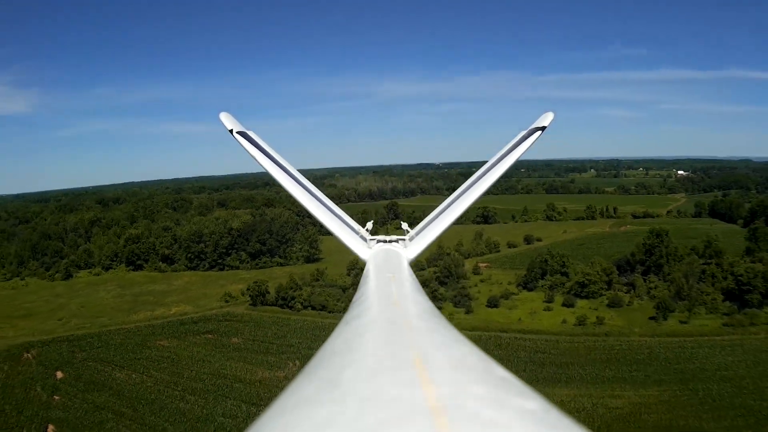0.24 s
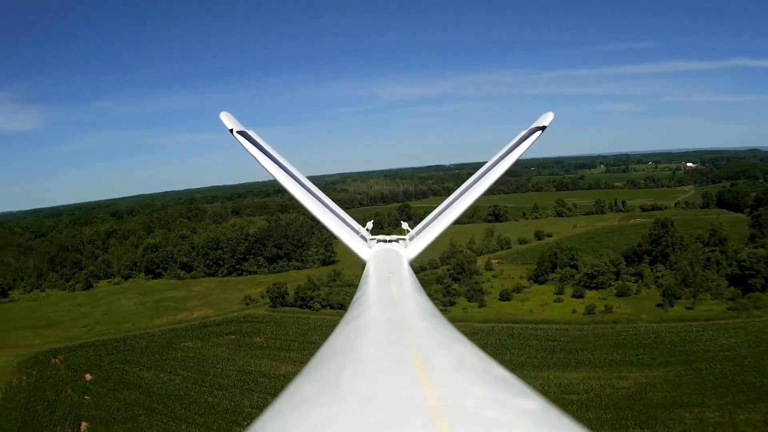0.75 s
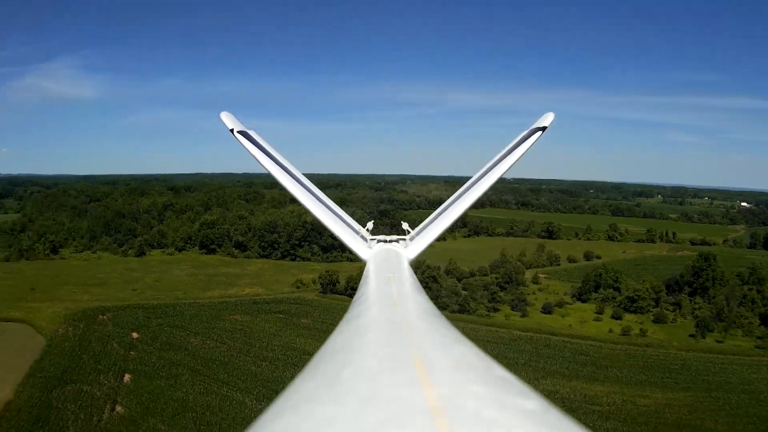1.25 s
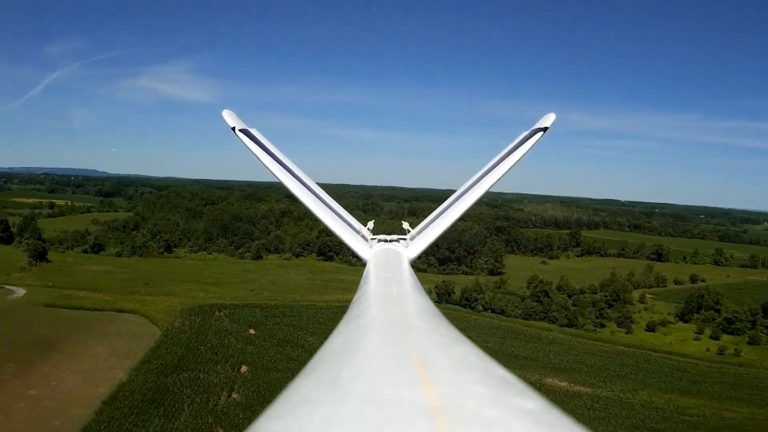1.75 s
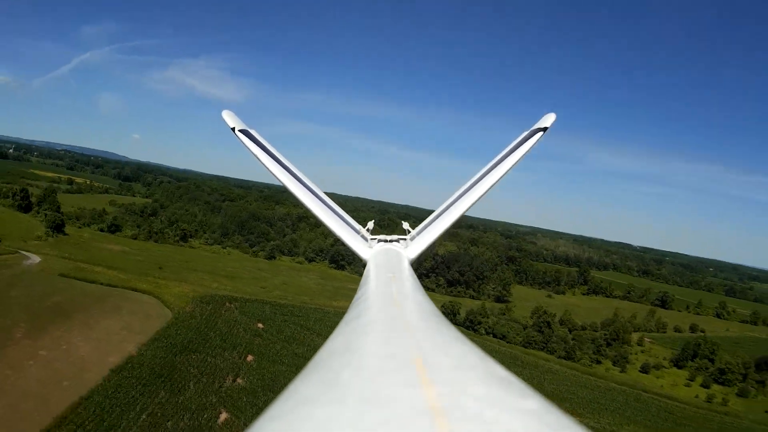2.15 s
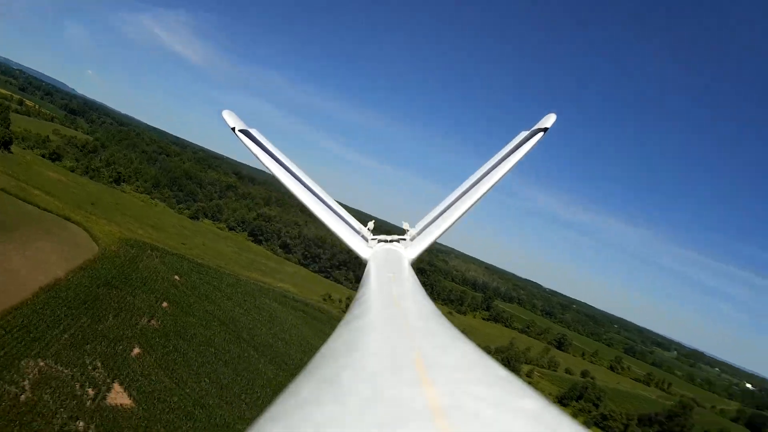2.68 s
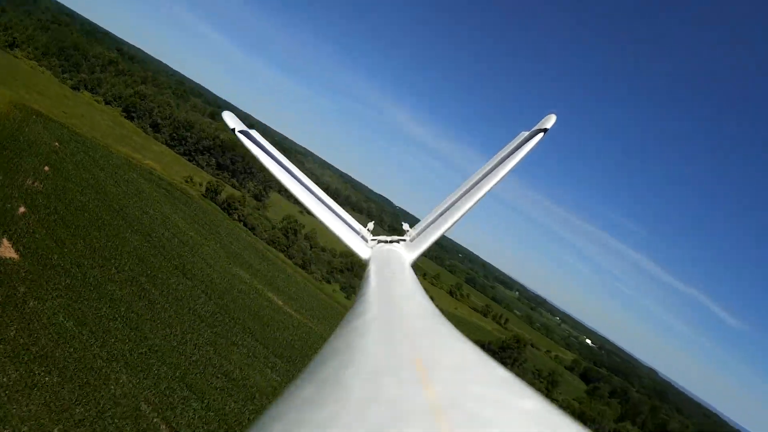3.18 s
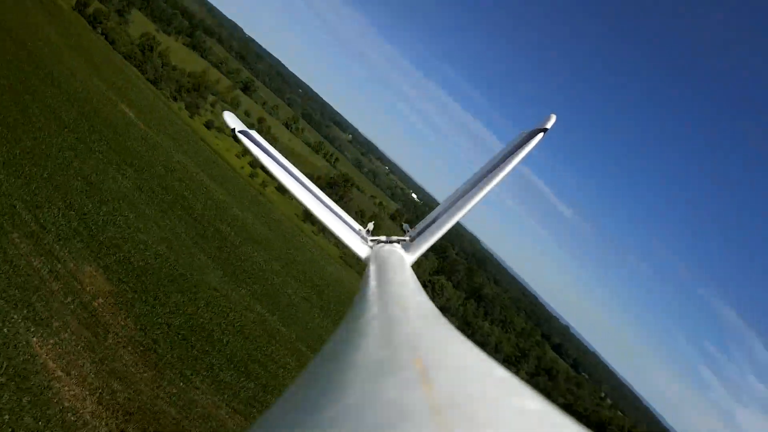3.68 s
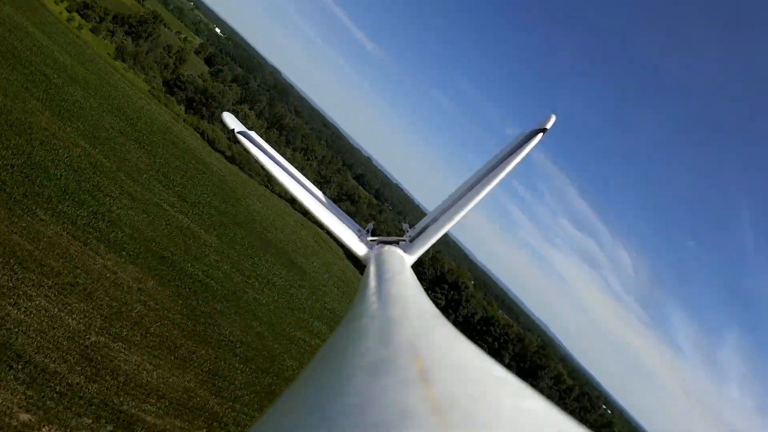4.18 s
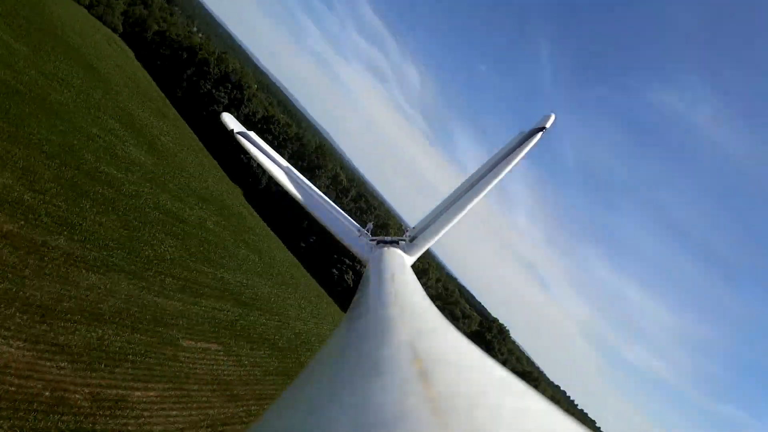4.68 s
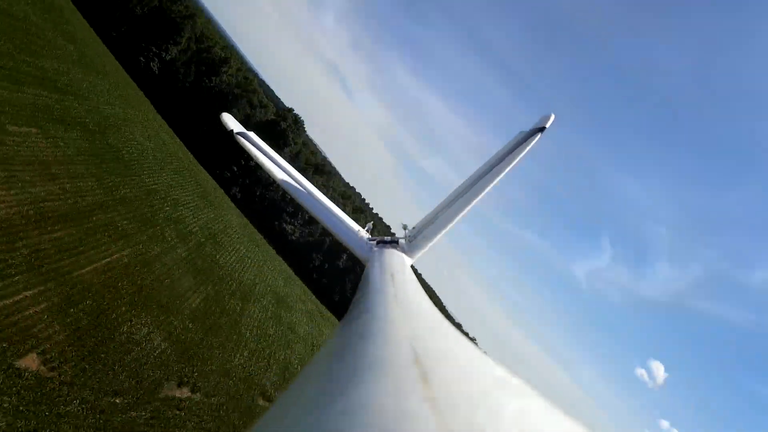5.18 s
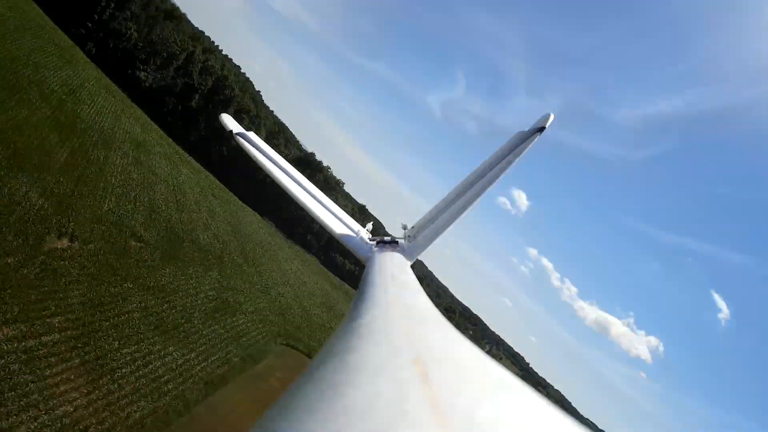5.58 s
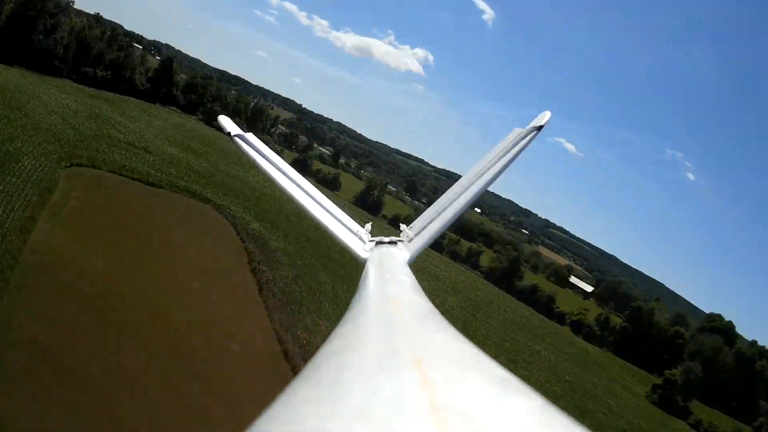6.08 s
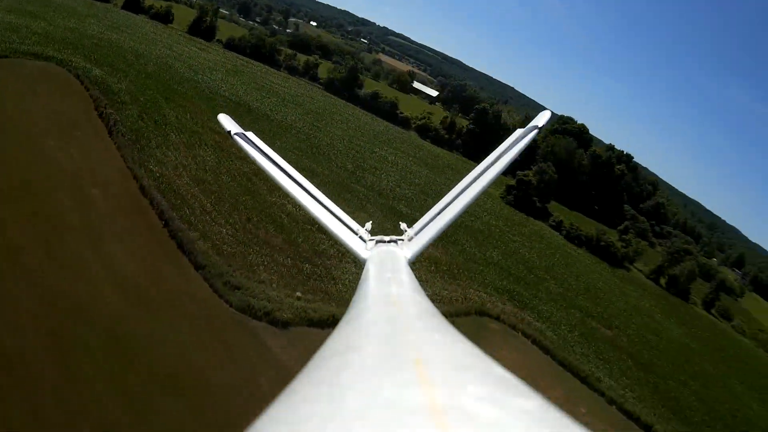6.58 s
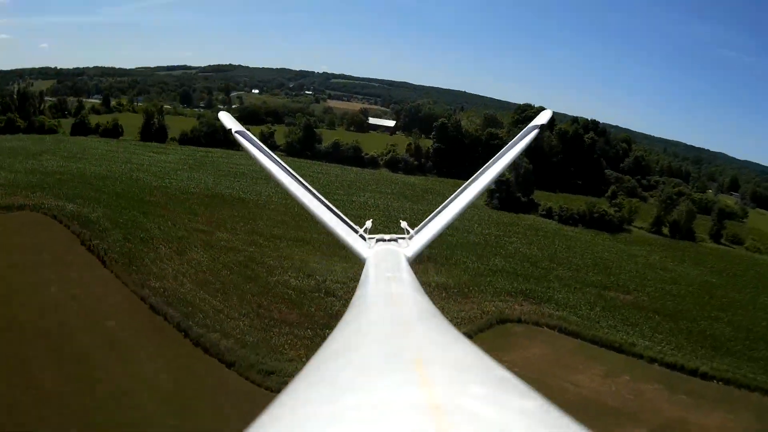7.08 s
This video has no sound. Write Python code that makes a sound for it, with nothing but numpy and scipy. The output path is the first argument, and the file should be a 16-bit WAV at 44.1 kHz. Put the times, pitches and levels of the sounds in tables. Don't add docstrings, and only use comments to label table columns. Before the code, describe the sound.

Close, steady wind presses on a tiny microphone aboard a gliding model aircraft, its low thumps flattening slightly on the loudest gusts. Quick servo knocks and short gear whirrs are heard early, with a few more around two seconds and faint ones past five. Light, high panel ticks scatter irregularly through the flight, while the finer rush dips briefly near the end. It is outdoors and without reverberation.

```python
import sys
import numpy as np
from scipy import signal
from scipy.fft import rfft, irfft, next_fast_len
from scipy.io import wavfile
from scipy.ndimage import uniform_filter1d

SR = 44100
rng = np.random.default_rng(int(sys.argv[2]) if len(sys.argv) > 2 else 0)


def wav_record(signal):
    frames = np.transpose(np.atleast_2d(signal))
    bounded = np.clip(frames, -1, 1)
    quanta = np.round(bounded * 32767).astype(np.int16)
    wavfile.write(sys.argv[1], SR, quanta)


def to_linear_factor(level_db):
    exponent = np.asarray(level_db, float) / 20
    return 10 ** exponent


N = 323694

# (f/Hz, level/dB, time to fall 60 dB/s)
PANEL_MODES = [(3530, -6.5, 0.0013), (4370, 17, 0.00092), (5760, 2, 0.0036), (6970, 8, 0.0024),
               (8040, -10.5, 0.0027), (9060, 1.5, 0.0049), (9000, -21, 0.025), (10300, -5.5, 0.0025),
               (15300, -11.5, .004)]


def unit(x):
    return x / np.sqrt(np.mean(x ** 2))


def shaped(x, colour):
    hz, db = np.transpose(colour)
    size = next_fast_len(N)
    bin_hz = np.arange(size // 2 + 1) * SR / size + 1
    gain = to_linear_factor(np.interp(np.log(bin_hz), np.log(hz), db))
    return irfft(rfft(x, size) * unit(gain), size)[:N]


def walk(rate_hz):
    hold = int(SR / rate_hz)
    steps = np.repeat(rng.standard_normal(N // hold + 1), hold)
    return unit(uniform_filter1d(uniform_filter1d(steps, hold), hold)[:N])


def struck(times, peak_db, modes, scatter_db, spread, rise_s=0.00015):
    out, t = np.zeros(N + 1024), np.arange(1024) / SR
    hz, db, t60 = np.transpose(modes)[:, :, None]
    chance = rng.standard_normal((len(times), 2, len(modes), 1))
    for s, top_db, (mix, detune) in zip(times, peak_db, chance):
        fade = to_linear_factor(db + scatter_db * mix - 60 * t / t60)
        ring = fade * np.sin(2 * np.pi * hz * (1 + spread * detune) * t)
        ring = ring.sum(axis=0) * np.minimum(t / rise_s, 1)
        out[int(s * SR):][:1024] += to_linear_factor(top_db) * ring
    return out[:N]


def flow():
    # (t/s, strength/dB, fineness of the eddies/dB)
    airflow = [(0, -41, -10.5), (.5, -42, -9.5), (.9, -42, -10.5), (1.2, -41.5, -9), (1.48, -41.5, -12),
               (1.7, -42, -8.5), (2.1, -41, -9.5), (2.45, -42, -11), (2.65, -42, -9), (3.1, -40, -10),
               (3.45, -41, -15), (3.7, -40.5, -12), (4.2, -41.5, -16), (4.95, -40.5, -12.5),
               (5.3, -41, -16), (6.6, -41, -14), (6.9, -42.5, -17.5), (7.34, -42.5, -10.5)]
    # (by strength [dB per dB], by fineness [dB per dB])
    follow = [
        (1.4, -0.92),
        (1.53, 0.37),
        (1.5, 1.14),
        (2, 0.6),
    ]
    s, *controls = np.transpose(airflow)
    changes = controls - np.mean(controls, axis=1, keepdims=True)
    return s, np.array(follow) @ changes


def lulls():
    # (t/s, recovery/s, change/dB)
    lapses = [
        (2.44, 0.08, 1),
        (4.5, .2, -3),
        (4.06, 0.3, -2.5),
        (5.269, 0.09, -3.5),
        (5.6, 0.2, -4.5),
        (6.745, 0.15, -8.5),
        (6.96, .3, -5.5),
    ]
    t, out = np.arange(N) / SR, np.zeros(N)
    for s, recovery, db in lapses:
        out += db * (t > s) * np.clip(1.5 - 2.7 * (t - s) / recovery, 0, 1)
    return uniform_filter1d(out, int(0.006 * SR))


def wind():
    # (f/Hz, level/dB per Hz)
    air = [(16, -13.5), (55, -1.4), (115, 0.5), (220, -2.5), (500, -13.5), (1150, -23), (1550, -24),
           (2000, -32.5), (3000, -38), (4200, -47), (5200, -53.5), (7700, -61), (9300, -65.5),
           (11500, -73.5)]
    part_hz = (50, 200, 1000, 5500)
    s, swing = flow()
    t = np.arange(N) / SR
    size = next_fast_len(N)
    spectrum = rfft(shaped(rng.standard_normal(N), air), size)
    octave = np.log2(np.arange(size // 2 + 1) * SR / size + 1)
    gust, puff, lull_db = walk(50), walk(120), lulls()
    out = 0
    for centre in np.arange(4, 14.5, 0.5):
        band = irfft(spectrum * np.maximum(1 - 2 * np.abs(octave - centre), 0), size)[:N]
        points = [np.interp(centre, np.log2(part_hz), column) for column in swing.T]
        small = np.clip((centre - 8.5) / 2.7, 0, 1)
        patch_db = small * (0.77 * gust + 1.25 * puff + lull_db) + 0.46 * walk(25)
        out = out + band * to_linear_factor(np.interp(t, s, points) + patch_db)
    return unit(out) * to_linear_factor(-41.0)


def servo_runs():
    # (t/s, length/s, level/dB, load on the case/dB)
    runs = [(0.268, 0.039, -71, -1), (0.568, 0.022, -66.5, 0), (0.613, 0.02, -68, 5),
            (0.643, 0.047, -78, 11), (0.747, 0.025, -64.5, 0), (0.783, 0.018, -73, 6),
            (0.972, 0.015, -77, 8), (1.109, 0.016, -77.5, 10), (1.147, 0.023, -82, 13),
            (1.204, 0.015, -85, 18), (1.247, .012, -82, 7), (1.284, 0.011, -81, 12), (1.304, .012, -79, 8),
            (1.526, 0.044, -67.5, -2.5), (1.829, 0.0585, -61.5, -16), (1.889, 0.025, -70.5, -4),
            (1.909, 0.02, -57, -11), (2.047, 0.014, -73.5, 4), (5.473, 0.026, -79, -6),
            (5.499, 0.085, -69.5, -23), (5.71, 0.24, -83, -2), (2.0, .3, -89, 7), (2.45, .3, -84, 2)]
    t, drive, load = np.arange(N) / SR, np.zeros(N), np.zeros(N)
    for s, length, db, load_db in runs:
        powered = (t > s) & (t < s + length)
        drive += to_linear_factor(db + 7.5) * powered
        load += to_linear_factor(db + load_db + 2.0) * powered
    return drive, load


def servo_twitches(hold_end_s):
    # (t/s, peak/dB, gear chatter
    # against the usual/dB)
    twitches = [(0.023, -49.5, 6), (0.0428, -49.5, 4), (0.096, -49, 6), (0.1142, -48.5, -2), (0.168, -52, -2),
                (0.188, -54.5, 4), (0.2034, -47.5, 3), (0.222, -49, 2), (0.2577, -46, -2), (0.294, -47, 0.1),
                (0.3845, -50.5, -2), (0.438, -56, 3), (0.5097, -51, 1), (0.5464, -50, -1), (0.5855, -48.5, 0.1),
                (0.612, -46.5, 4), (0.6533, -49, 5), (0.689, -49, 1), (0.7075, -45.5, -4), (0.752, -50, -3),
                (0.834, -45.5, 2), (0.8524, -52, -3), (0.906, -47.5, -2), (0.9955, -46.5, 1), (1.1124, -51, -8),
                (1.1503, -48, -3), (1.165, -47, -10), (1.2101, -48, -14), (1.275, -57, -8), (1.2887, -45, -8),
                (.0056, -49, 6),
        (.866, -54, -3),
        (2.029, -53, -2),
        (2.065, -52, -6),
        (2.085, -54, -6),
        (2.627, -58, 1),
        (2.803, -55, -4),
        (3.031, -63, -1),
        (7.075, -54.5, -14),
        (7.216, -70, -4),
    ]
    # (f/Hz, level/dB, time to fall 60 dB/s)
    case = [(1445, 11, 0.0064), (2250, 5, 0.0062), (3000, 5, 0.0046), (4010, 6, 0.0062), (4750, 3, 0.0046),
            (5540, -8, 0.0036), (7400, -16, 0.0037)]
    s, db, gear_db = np.transpose(twitches)
    frames = np.arange(0.0056, hold_end_s, 0.01799)
    slight_db = -59.5 + 3.5 * rng.standard_normal(len(frames))
    kicks = np.zeros(N)
    kicks[(s * SR).astype(int)] = to_linear_factor(db + gear_db - 11.5)
    kicks[(frames * SR).astype(int)] += to_linear_factor(slight_db - 6.0)
    coasting = signal.lfilter([1], [1, -np.exp(-1 / (0.0038 * SR))], kicks)
    slight = struck(frames, slight_db, case, scatter_db=3.5, spread=0.027, rise_s=0.00066)
    knocks = struck(s, db - 0.5, case, scatter_db=3.5, spread=0.038, rise_s=0.0012)
    return coasting, slight + knocks


def servo():
    # (f/Hz, level/dB per Hz)
    gears = [(1300, 1), (2300, -5.5), (3200, -10.5), (3900, -3), (4700, -13.5), (5300, -16), (5900, -13.5),
             (6800, -16), (7700, -13), (8500, -20), (9500, -15.5), (10300, -42), (11400, -28), (13000, -66)]
    # (f/Hz, level/dB per Hz)
    loaded_case = [(2600, -22), (3500, -1.5), (3900, 4), (4600, -7), (6000, -33.5)]
    hold_end_s = 1.35
    drive, load = servo_runs()
    coasting, knocks = servo_twitches(hold_end_s)
    strain = to_linear_factor(-82 + 3.0 * walk(25)) * (np.arange(N) / SR < hold_end_s)
    teeth = rng.standard_normal((2, N)) * to_linear_factor(2.2 * walk(400))
    turning = uniform_filter1d(drive, int(0.002 * SR)) + coasting + strain
    chatter = shaped(teeth[0] * turning, gears)
    groan = shaped(teeth[1] * (load + 0.68 * strain), loaded_case)
    return chatter + groan + knocks


def panel_rattle():
    touch_db = np.minimum(6.1 * rng.exponential(size=N), 13)
    touches = (rng.random(N) < 500 / SR) * to_linear_factor(touch_db)
    s, swing = flow()
    hiss_db = np.interp(np.arange(N) / SR, s, swing[-1])
    push_db = 0.6 * (hiss_db + lulls()) + 1.5 + 2.2 * walk(8.2)
    one_touch = struck([0], [-94.5], PANEL_MODES, scatter_db=1.1, spread=0.012)[:1024]
    return signal.fftconvolve(touches * to_linear_factor(push_db), one_touch)[:N]


def flutter():
    # (t/s, peak/dB)
    hard = [(1.039, -58), (1.4979, -64), (1.6458, -61), (1.681, -59.5), (1.7296, -58.5), (1.7375, -60),
            (2.1001, -65), (3.2792, -60.5), (3.5336, -65), (3.627, -66), (3.681, -59), (3.7123, -64),
            (3.9794, -65), (4.6681, -66.5), (4.8238, -67), (4.8998, -63.5), (5.0519, -67), (5.0806, -66),
            (5.3074, -65.5), (5.4505, -64.5), (5.7496, -62.5), (6.0173, -66.5), (6.057, -64.5),
            (6.2563, -71), (6.3036, -66.5), (6.505, -74), (6.5729, -63.5), (6.701, -66), (6.9238, -68.5),
            (7.3393, -58.5)]
    # (t/s, length/s, ticks per s, usual peak/dB)
    spells = [(1.377, .09, 40, -74), (2.025, .14, 35, -77), (2.585, .46, 11, -86), (3.158, .05, 35, -71.5),
              (3.304, .22, 60, -71.5), (3.645, .37, 38, -70.5), (4.064, .05, 60, -74),
              (4.268, 0.26, 15, -75), (4.662, 0.066, 40, -67), (4.762, 0.16, 60, -72.5),
              (4.98, 0.14, 22, -68.5), (5.229, .27, 50, -73), (5.613, 0.07, 80, -72),
              (5.984, 0.42, 24, -70), (6.438, .29, 42, -69), (6.843, .12, 29, -71.5), (7.135, .02, 79, -75)]
    even = 0.49
    rows = list(hard)
    for start, length, rate, db in spells:
        gaps = (even + (1 - even) * rng.exponential(size=32)) / rate
        at = np.cumsum(gaps) - gaps[0] / 2
        top_db = db + 3.5 * np.clip(rng.standard_normal(size=32), -2, 1.3)
        rows += [(start + a, top) for a, top in zip(at, top_db) if a < length]
    return np.transpose(rows)


def panel_snaps():
    # (t/s, peak/dB)
    sharp = [
        (1.039, -64),
        (1.7296, -66),
        (1.915, -60),
        (2.252, -70),
        (3.681, -68),
        (4.807, -69),
        (5.7496, -58),
        (7.3385, -57),
    ]
    out = np.zeros(N)
    for s, top_db in sharp:
        out[int(s * SR):][:2] = to_linear_factor(top_db) * np.array([1, -1])
    return out


def panel():
    # (f/Hz, level/dB)
    hull = [(1000, 4.5), (11000, -5), (11700, -14), (14200, -13), (15200, -5)]
    # (f/Hz, level/dB)
    ring_colour = [(4000, -23.5), (5500, 0), (7000, -0.5), (8300, -5), (9250, 1), (10000, -9),
                   (11000, -7.5), (11600, -31)]
    s, db = flutter()
    blows = np.zeros(N)
    blows[(s * SR).astype(int)] = to_linear_factor(db - 20.5)
    fading = signal.lfilter([1], [1, -np.exp(-1 / (0.0085 * SR))], blows)
    after_ring = shaped(fading * rng.standard_normal(N), ring_colour)
    ticks = struck(s, db + 2.3, PANEL_MODES, scatter_db=2.0, spread=0.015)
    return shaped(ticks + panel_rattle(), hull) + after_ring + panel_snaps()


def scene():
    return (wind() + servo() + panel())[None]


def roll_off(x):
    return signal.sosfilt(signal.butter(12, 15740, fs=SR, output="sos"), x)


def record(dry):
    top = to_linear_factor(-31)
    hiss = to_linear_factor(-104) * rng.standard_normal(dry.shape)
    return roll_off(np.clip(dry, -top, top) + hiss)


dry = scene()
out = record(dry)
wav_record(out)
```